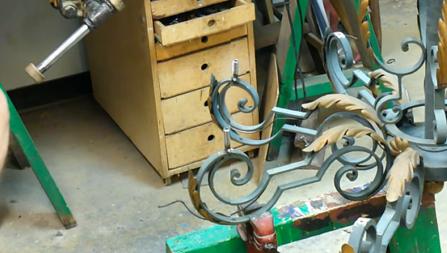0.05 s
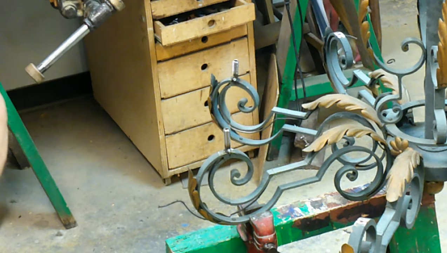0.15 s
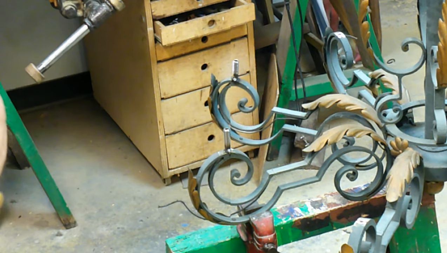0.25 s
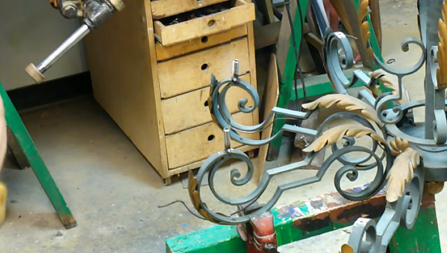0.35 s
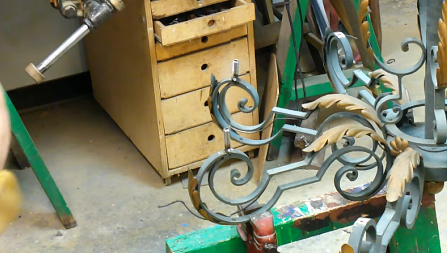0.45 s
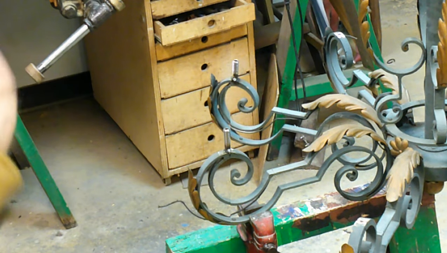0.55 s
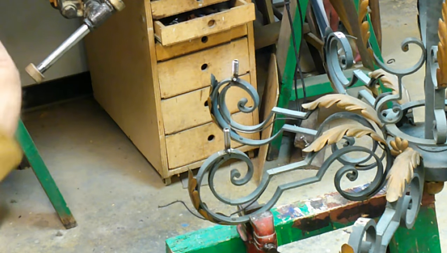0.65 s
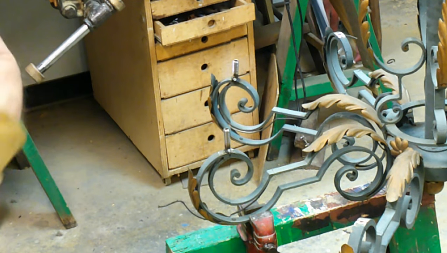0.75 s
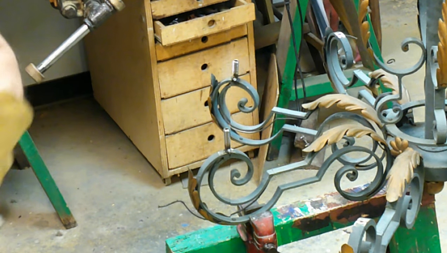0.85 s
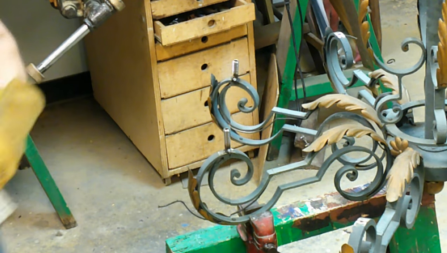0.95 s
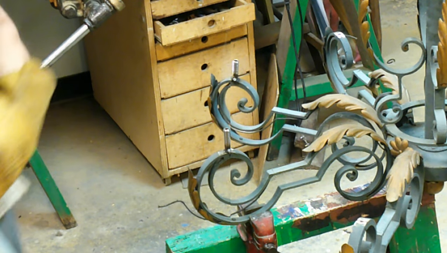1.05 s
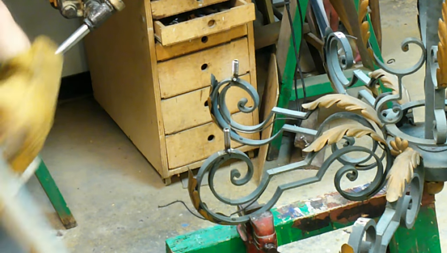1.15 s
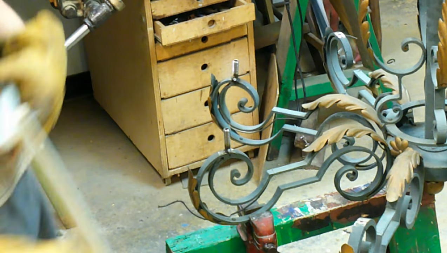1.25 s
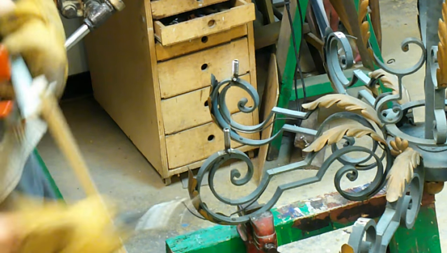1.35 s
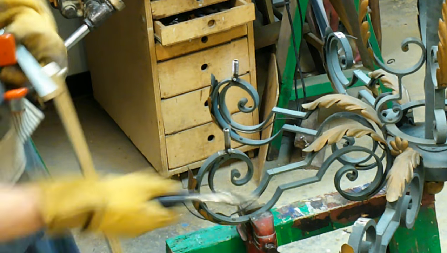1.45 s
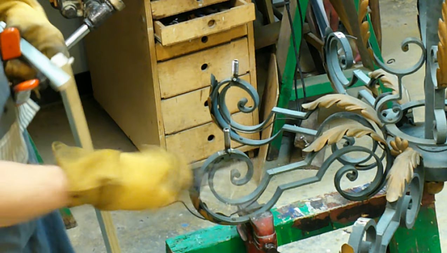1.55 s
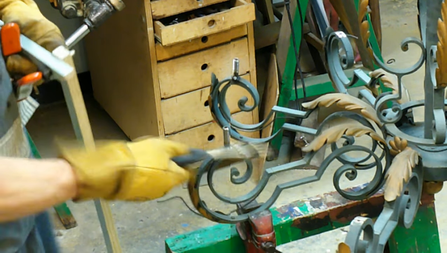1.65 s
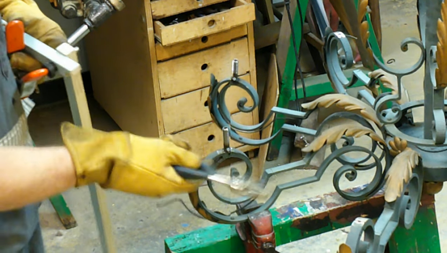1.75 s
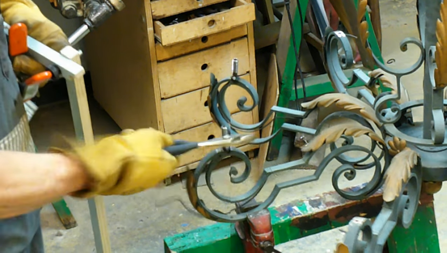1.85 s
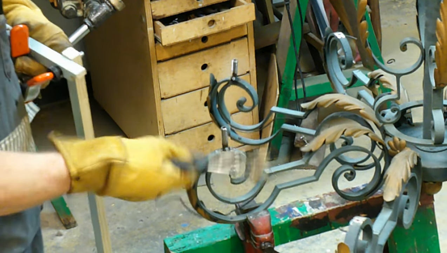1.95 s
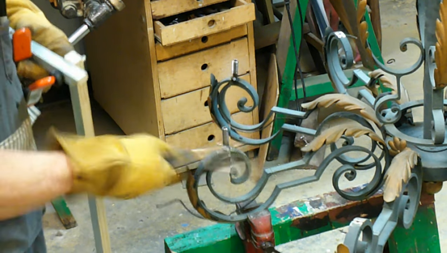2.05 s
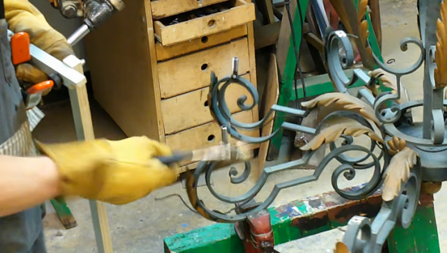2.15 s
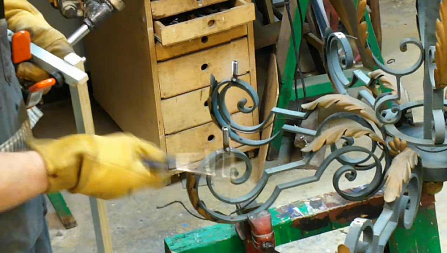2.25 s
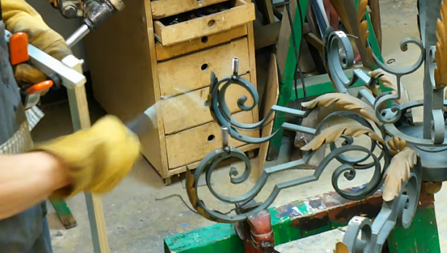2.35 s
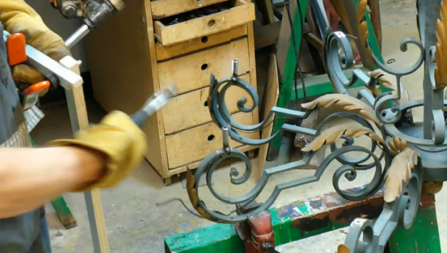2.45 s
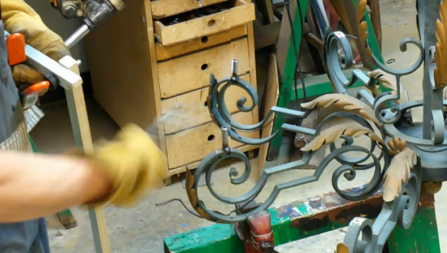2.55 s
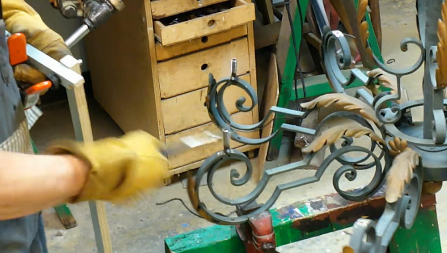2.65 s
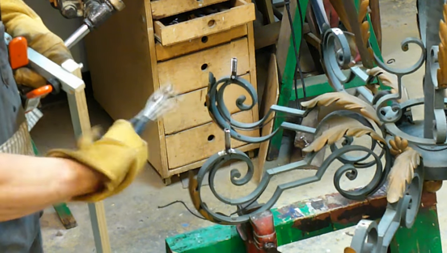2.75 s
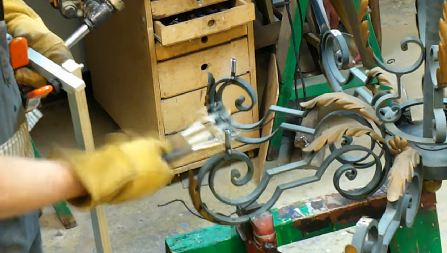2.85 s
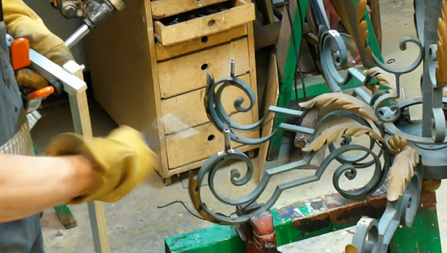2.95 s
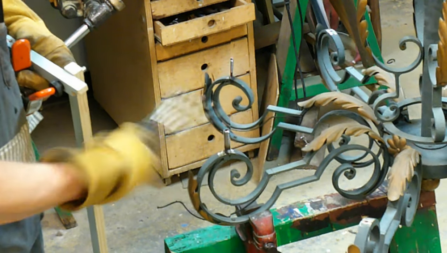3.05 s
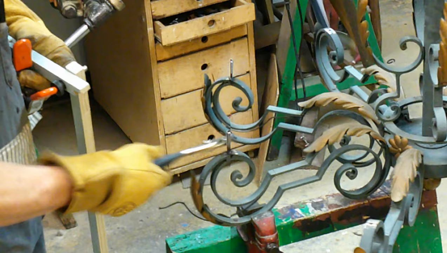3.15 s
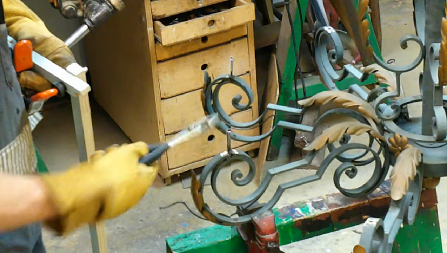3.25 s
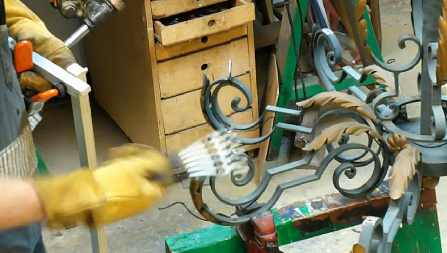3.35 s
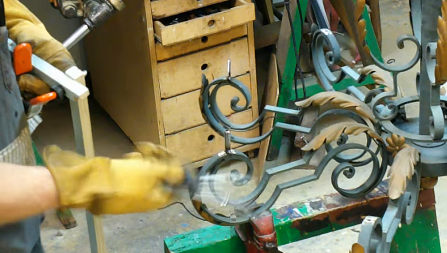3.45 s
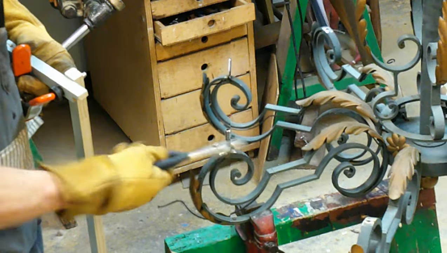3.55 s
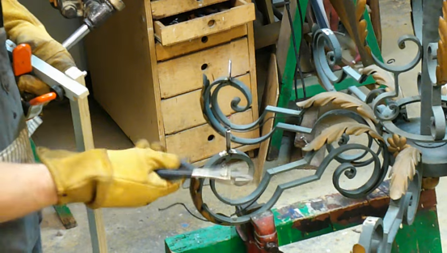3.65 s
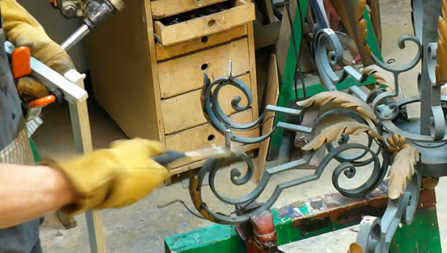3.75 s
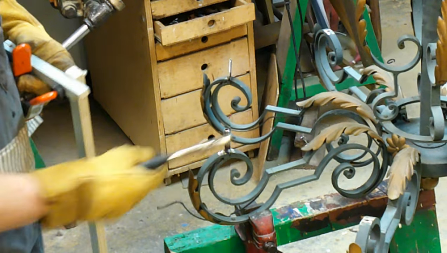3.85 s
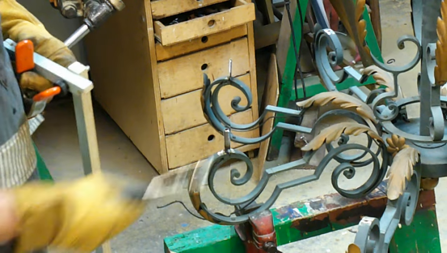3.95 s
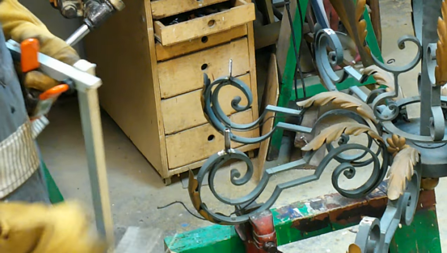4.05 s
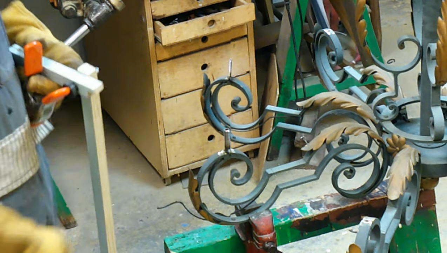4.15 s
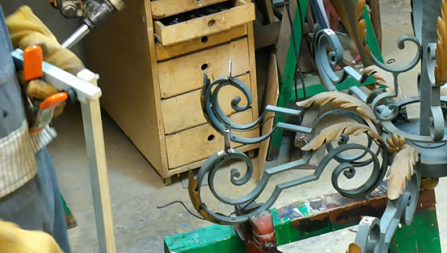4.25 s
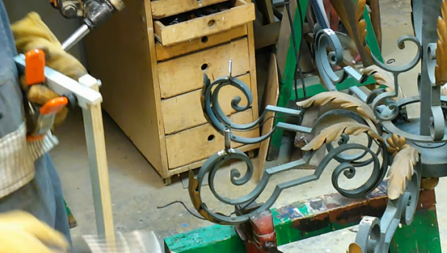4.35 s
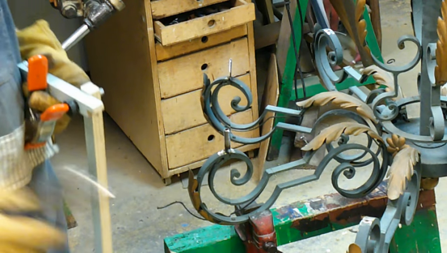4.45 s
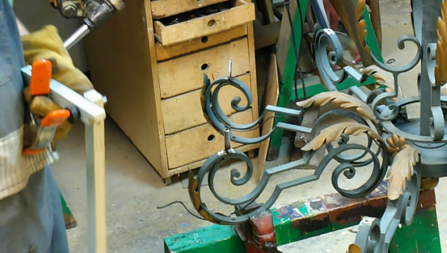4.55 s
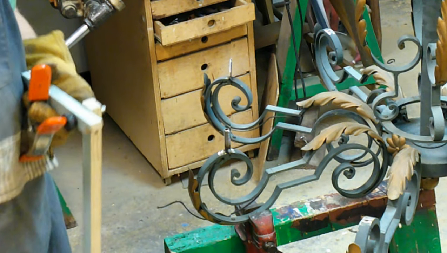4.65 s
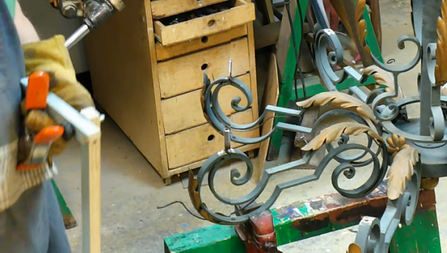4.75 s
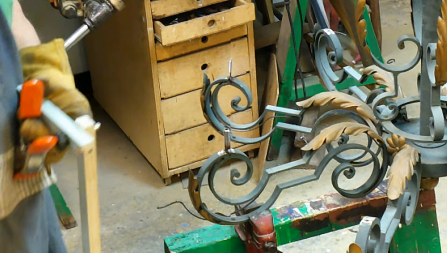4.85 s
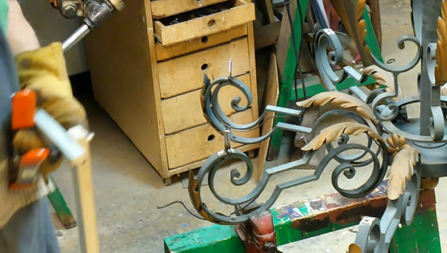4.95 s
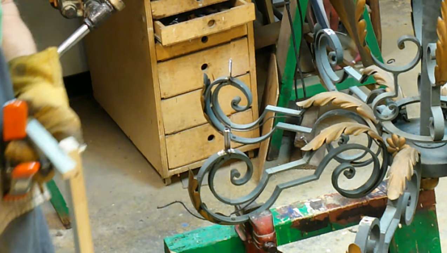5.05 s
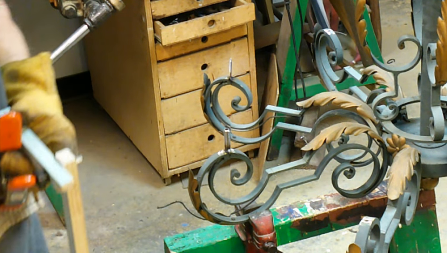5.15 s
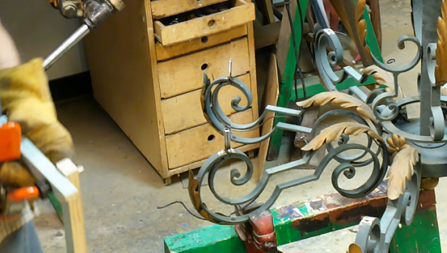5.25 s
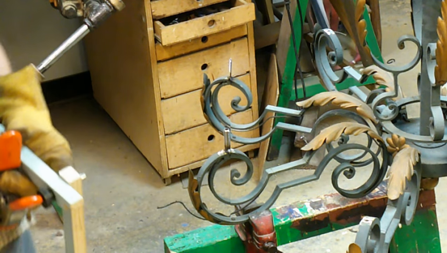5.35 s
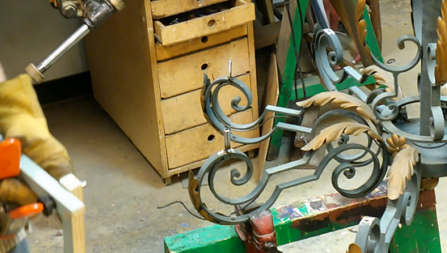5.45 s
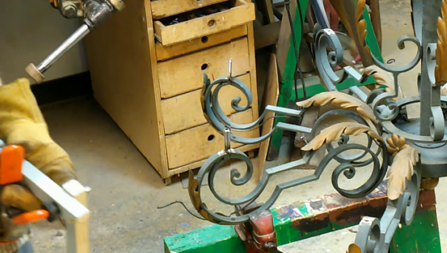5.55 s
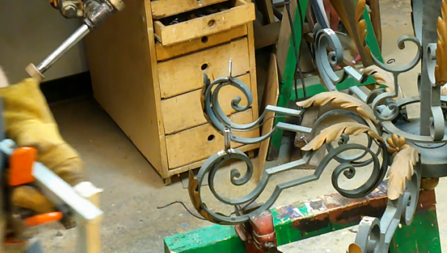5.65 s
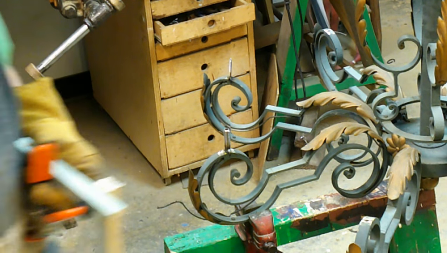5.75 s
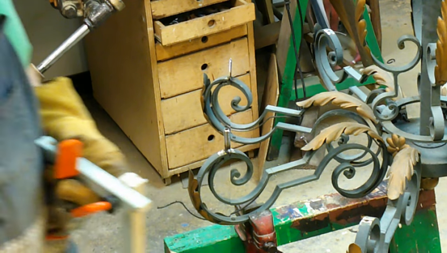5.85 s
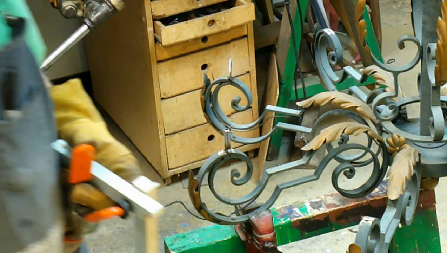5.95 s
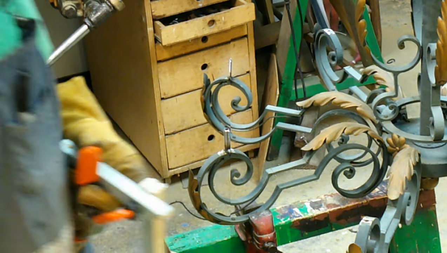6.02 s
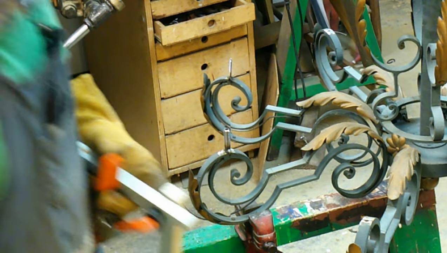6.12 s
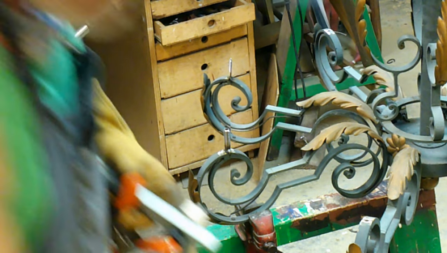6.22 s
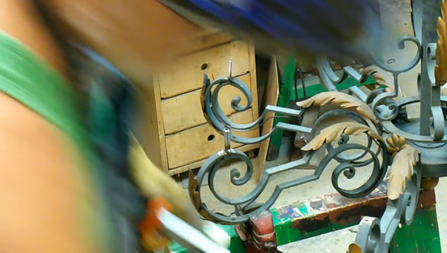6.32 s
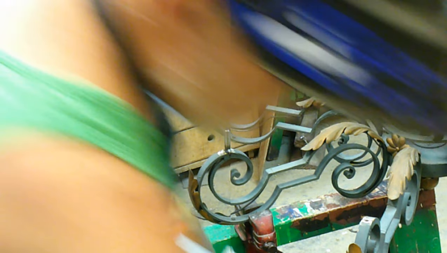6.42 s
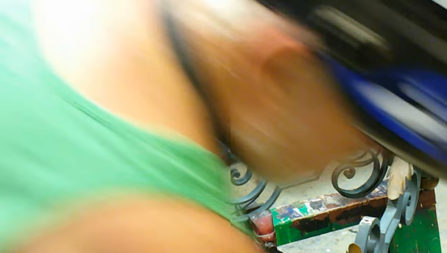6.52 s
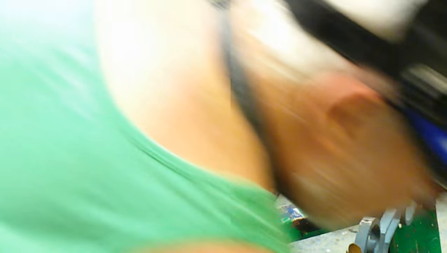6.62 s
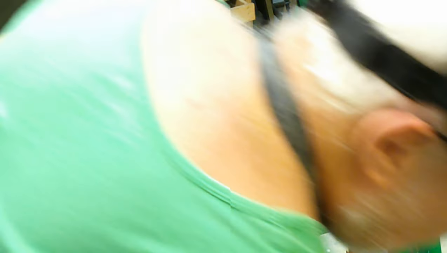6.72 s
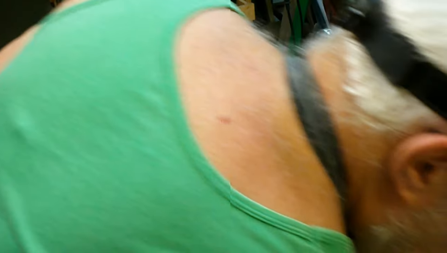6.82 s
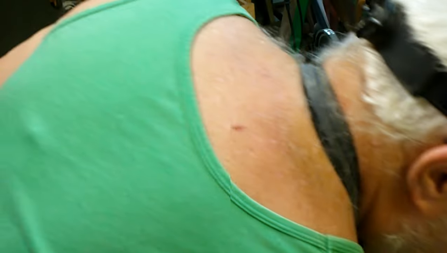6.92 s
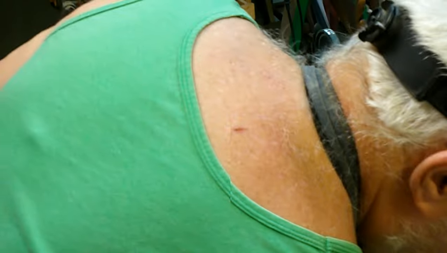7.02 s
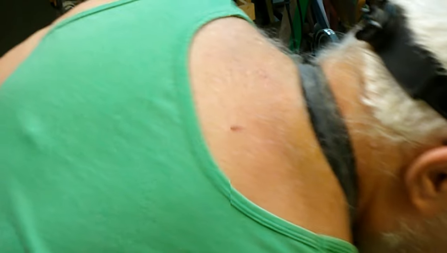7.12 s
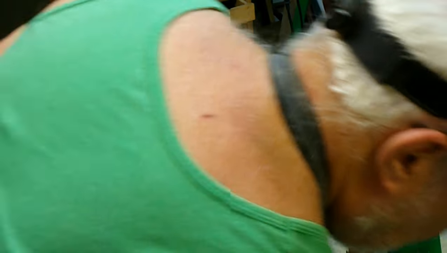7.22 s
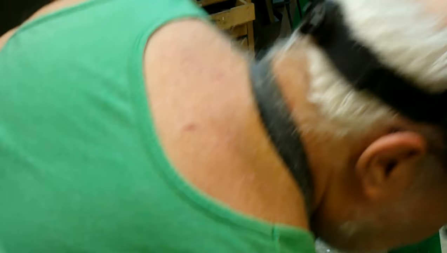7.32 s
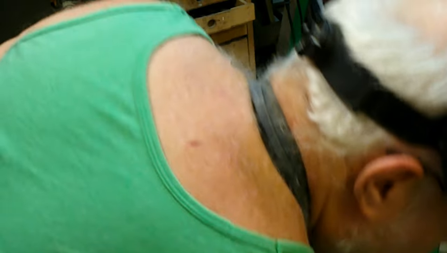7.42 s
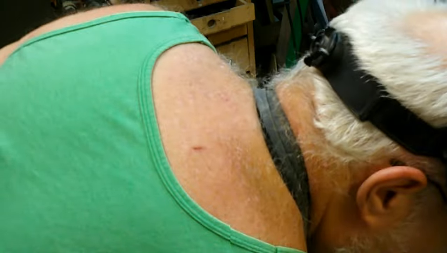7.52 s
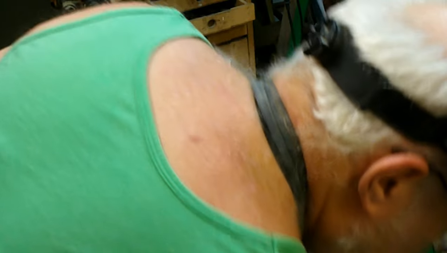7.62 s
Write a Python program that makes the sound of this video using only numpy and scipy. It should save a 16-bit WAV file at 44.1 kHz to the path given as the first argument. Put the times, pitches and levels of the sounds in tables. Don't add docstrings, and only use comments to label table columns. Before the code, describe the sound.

In a humming workshop, a clamp clanks and wood knocks, then nine hard metallic taps crack and ring briefly, followed by light handling sounds.

```python
import sys
import numpy as np
from scipy import signal
from scipy.fft import rfft, irfft, next_fast_len
from scipy.io import wavfile
from scipy.ndimage import uniform_filter1d, map_coordinates

SR = 44100
rng = np.random.default_rng(int(sys.argv[2]) if len(sys.argv) > 2 else 0)


def voltage_ratio(level):
    return 10 ** (np.asarray(level, float) / 20)


def wav_out(sig):
    wavfile.write(sys.argv[1], SR, np.round(np.clip(np.atleast_2d(sig).T, -1, 1) * 32767).astype(np.int16))


N = 338688


def unit(x):
    return x / np.sqrt(np.mean(x ** 2) + 1e-20)


def along(points, hz):
    point_hz, value = np.transpose(points)
    return np.interp(np.log(hz + 1), np.log(point_hz + 1), value)


def filtered(x, response):
    size = next_fast_len(N + 8192)
    return irfft(rfft(x, size) * response(np.fft.rfftfreq(size, 1 / SR)), size)[..., :N]


def wobble(rate):
    knots = rng.standard_normal(int(N * rate / SR) + 4)
    return map_coordinates(knots, [np.arange(N) * rate / SR])


def patches(shape, across_hz, across_time):
    field = uniform_filter1d(rng.standard_normal(shape), size=across_hz, axis=0)
    return unit(uniform_filter1d(field, size=across_time, axis=1))


# time_s, rush_db
MACHINE_LEVEL = [
    (0, -35),
    (5, -35),
    (5.78, -34.5),
    (6.27, -34.5),
    (7.34, -34.5),
    (7.53, -39),
    (7.68, -42.5),
]
# pitch_hz, level_db (per Hz)
AIR_RUSH = [(12, -49), (20, -27), (178, -18.5), (206, -3.5), (380, -13.5), (409, -5.5), (562, -8),
            (605, -5), (875, -2.5), (989, -3.5), (1300, -4.5), (2450, -11), (3290, -11.5), (4990, -25),
            (7040, -22.5), (9150, -59), (15500, -120)]
# pitch_hz, level_db
FAN_TONES = [(211.4, -50), (233, -58.5), (416, -60), (690, -65.5), (874, -48), (639, -49), (1060, -62.5),
             (1325, -50.5), (1430, -57), (1700, -54), (2012, -55.5), (2724, -54.5), (3235, -63.5)]


def machine():
    t = np.arange(N) / SR
    level_db = np.interp(t, *np.transpose(MACHINE_LEVEL))
    z = signal.stft(rng.standard_normal(N), nperseg=512)[2]
    air = signal.istft(z * voltage_ratio(1.13 * patches(z.shape, 5, 10)), nperseg=512)[1][:N]
    air = unit(filtered(air, lambda f: voltage_ratio(along(AIR_RUSH, f)))) * voltage_ratio(-1.0 + 0.6 * wobble(12))
    tones = np.zeros(N)
    for hz, db in FAN_TONES:
        drift = 2 * np.pi * 3 * np.cumsum(wobble(12)) / SR
        tones += voltage_ratio(db + 37.0 + 2.8 * wobble(6)) * np.sin(2 * np.pi * hz * t + drift)
    return voltage_ratio(level_db) * (air + tones)


def rafters():
    level_db, t60_s, rise_s = -28.5, 1.14, 0.031
    swell, t = np.zeros(N + SR), np.arange(SR) / SR
    shape = voltage_ratio(-60 * t / t60_s) * (1 - np.exp(-t / rise_s))
    for start_s, db, *_ in TAPS:
        swell[round(start_s * SR):][:SR] += voltage_ratio(db) * shape
    tilt = [(1500, 0.5), (6000, 8)]  # (Hz, dB)
    wash = filtered(rng.standard_normal(N), lambda f: voltage_ratio(along(AIR_RUSH, f) + along(tilt, f)))
    return voltage_ratio(level_db) * swell[:N] * unit(wash)


def crowding_db(crowds, hz):
    humps = sum(voltage_ratio(db - 3.5) * np.exp(-((hz - centre) / (width + 150)) ** 2)
                for centre, width, db in crowds)
    return 20 * np.log10(1 + humps)


def dying(level_db, t60, size=128, clumps_db=0):
    hz, t, z = signal.stft(rng.standard_normal(SR // 2), SR, nperseg=size)
    clumps = clumps_db * patches(z.shape, 2, 6)
    decay_db = -60 * t / t60(hz)[:, None]
    shaped = z * voltage_ratio(clumps + level_db(hz)[:, None] + decay_db)
    return signal.istft(shaped, SR, nperseg=size)[1][:SR // 2]


# pitch_hz, level_db (per Hz)
DENSE_IRON = [(60, -48), (180, -18.5), (300, -17), (600, -8.5), (900, -4), (1400, -1), (1600, -6),
              (3300, -3), (4300, -3.5), (5200, -4.5), (6400, 0.5), (7200, -1), (9000, -35), (15000, -120)]
# pitch_hz, t60_s
DENSE_DECAY = [(150, .3), (500, 0.36), (1200, 0.32), (2500, 0.2), (4500, 0.14), (7000, 0.17)]
# pitch_hz, level_db
CONTACT_CRACK = [(150, -41), (500, 0), (2000, 3.5), (7000, -1)]
# pitch_hz, t60_s
SHOP_DECAY = [(200, 0.86), (1000, 0.52), (3000, 0.39), (7000, 0.37)]
TONE_BANDS = [500, 1350, 3000, 5800]


def knocks(events, modes, ring_db, dense_db, crack_db, lows_db, scatter_db, rise, wet_db, crowds=()):
    out, t = np.zeros(N + 2 * SR), np.arange(SR // 2) / SR
    hz, level_db, t60 = np.transpose(modes)[:, :, None]
    t60 = np.minimum(t60, 0.55)
    for start_s, db, body_db, sheen_db, damp in events:
        balance = list(zip(TONE_BANDS, [body_db + lows_db, body_db, 0, sheen_db]))

        def dense_level(f):
            return dense_db + along(DENSE_IRON, f) + along(balance, f) + crowding_db(crowds, f)

        def crack_level(f):
            return crack_db + along(CONTACT_CRACK, f) + along(balance, f)

        strength, phase, beat_rate = rng.standard_normal((3, len(modes), 1))
        beat = 1 + 0.36 * np.sin(2 * np.pi * 25 * (1 + beat_rate) * t + 3 * phase)
        envelope = voltage_ratio(ring_db + level_db + scatter_db * strength) * np.exp(-np.log(1000) / t60 * t)
        ring = (beat * envelope * np.sin(2 * np.pi * hz * t + phase)).sum(axis=0)
        dense = dying(dense_level, lambda f: damp * along(DENSE_DECAY, f), size=256, clumps_db=1.58)
        crack = dying(crack_level, lambda f: 0.0068 + 0 * f)
        blow = (ring + dense) * (1 - np.exp(-t / rise)) + crack
        tail = dying(np.zeros_like, lambda f: along(SHOP_DECAY, f)) * (1 - np.exp(-t / 0.0034))
        echo = voltage_ratio(wet_db) * signal.fftconvolve(dense + crack, tail / np.linalg.norm(tail))
        start = round(start_s * SR)
        out[start:][:len(t)] += voltage_ratio(db) * blow
        out[start:][:len(echo)] += voltage_ratio(db) * echo
    return out[:N]


# start_s, level_db (peak), pitch_hz, t60_s
SNAPS = [
    (.7182, -4, 930, .035),
    (5.192, -11.5, 1000, .005),
    (5.2135, -12, 1500, .006),
    (5.2225, -19, 600, .015),
    (1.3915, -21, 1100, .025),
    (7.428, -16, 1250, .03),
    (7.43, -20, 3200, .04),
    (5.478, -27, 900, .04),
    (4.28, -36, 1320, .3),
]


def snaps():
    out, t = np.zeros(N), np.arange(SR // 5) / SR
    for start_s, db, hz, t60 in SNAPS:
        out[round(start_s * SR):][:len(t)] += voltage_ratio(db - 60 * t / t60) * np.sin(2 * np.pi * hz * t)
    return out


# start_s, level_db (peak), body_db, sheen_db, decay (factor)
CLAMP_BLOWS = [
    (0.4663, 1.04, -6.5, -16, 0.99),
]
STICK_BLOWS = [
    (0.5494, -25.5, 5, -8, 0.67),
    (0.7173, -14.5, 8, -25, 0.32),
    (0.7444, -24, 2, -20, 0.42),
    (0.7744, -28.5, 2, -15, 0.7),
    (0.799, -34, -8, -9, 0.66),
]
PART_BLOWS = [
    (0.0114, -12.5, -8, -19.5, 0.52),
    (0.0844, -21, -13, -20, 0.41),
    (1.3904, -22, 6, -15, 0.7),
    (5.2124, -10, -4.5, -19.5, 0.44),
    (5.4774, -41, -7, -19, 0.5),
    (6.2135, -28.5, -7, -9.5, 1),
    (7.4163, -17, -0.5, -6, 0.92),
]
PIN_BLOWS = [
    (5.2313, -24.5, -20, -4, 1),
]
# start_s, level_db (peak), sheen_db
SCUFFS = [
    (0.6202, -29, -6),
    (0.8628, -27, -10),
    (4.658, -22, -28),
    (4.679, -28, -23),
    (5.4047, -33, -9),
    (6.4557, -28, -28),
    (7.194, -26, -16),
]
# pitch_hz, level_db, t60_s
CLAMP_MODES = [(1330, -14, .25), (1642, -14, .25), (1879, -2, .17), (2498, -7.5, .4), (2525, -7, .18),
               (2632, -7, .16), (2794, -6, .17), (3219, -2, .25), (3330, -7, .15), (4054, -6, .15),
               (4200, -3, .08), (4339, -8, .14), (4646, -14, .14), (5900, -12, .08)]
STICK_MODES = [(480, -9, .24), (530, -8, .15), (700, -8, .1), (861, -3, .17), (942, 0, .19),
               (1040, -5, .14), (1297, -10, .1), (2003, -8, .05), (3200, -10, .04)]
PART_MODES = [(640, -18, .05), (1040, -21, .06), (3275, 1, 0.087)]
PIN_MODES = [(3400, -8, .05), (6450, -4, .04), (6600, -9, .16), (6800, -4, .05)]


def handling():
    clamp = knocks(CLAMP_BLOWS, CLAMP_MODES, ring_db=-8, dense_db=4.5, crack_db=3, lows_db=-13,
                   scatter_db=0, rise=0.0008, wet_db=-10)
    stick = knocks(STICK_BLOWS, STICK_MODES, ring_db=0, dense_db=5.5, crack_db=-12, lows_db=0.5,
                   scatter_db=2.0, rise=0.0007, wet_db=-5.0, crowds=[(760, 110, 1.8)])
    parts = knocks(PART_BLOWS, PART_MODES, ring_db=-28.5, dense_db=5.5, crack_db=5, lows_db=2,
                   scatter_db=-5, rise=0.0028, wet_db=-6.5)
    soft = [(start_s, db, -1.5, sheen_db, 0.52) for start_s, db, sheen_db in SCUFFS]
    scuffs = knocks(soft, PART_MODES, ring_db=-30, dense_db=12, crack_db=-30, lows_db=-5,
                    scatter_db=0, rise=0.015, wet_db=-12)
    pin = knocks(PIN_BLOWS, PIN_MODES, ring_db=6, dense_db=4, crack_db=-3, lows_db=9,
                 scatter_db=0, rise=0.001, wet_db=-9)
    return clamp + stick + parts + scuffs + pin + snaps()


# start_s (mid-swell), length_s, low_tone_db, high_tone_db
BLADE_SWINGS = [
    (2.04, .2, -50, -43),
    (2.33, .12, -54, -46),
    (2.54, .24, -48, -46),
    (3.345, .26, -45, -54),
    (3.97, .2, -43, -52),
]
BLADE_TONES = [5520, 6860]


def blade():
    t = np.arange(N) / SR
    flutter = voltage_ratio(4 * np.array([wobble(60), wobble(60)]))
    low, high = flutter * np.sin(2 * np.pi * np.outer(BLADE_TONES, t))
    out = np.zeros(N)
    for middle_s, length_s, low_db, high_db in BLADE_SWINGS:
        swell = np.cos(np.pi * np.clip((t - middle_s) / length_s, -0.5, 0.5)) ** 2
        out += swell * (voltage_ratio(low_db) * low + voltage_ratio(high_db) * high)
    return out


# start_s, level_db (peak), first_scroll_db, second_scroll_db, third_scroll_db
TAPS = [
    (1.6518, 1, 5, 6.5, 4.5),
    (1.8878, -1, 1.5, 5.5, 0.5),
    (2.1209, -0.5, -3.5, -5.5, -16),
    (2.3605, -2.5, -6, -19, -1),
    (2.6504, -0.5, 3.5, 2, 1.5),
    (2.9032, -0.5, 2.5, 3, -15),
    (3.1447, 0, 3, -3.5, -9),
    (3.565, 0, 3, -1, -4),
    (3.8003, -.5, -18, -5, -1),
]
# pitch_hz, pitch_hz, pitch_hz
UNDER_TOOL = [(1443, 4915, 5340), (1750, 3386, 956), (956, 4915, 2772), (705, 4258, 4360),
              (1443, 3386, 2261), (4915, 3957, 2406), (2024, 1168, 4549), (3739, 2355, 5391),
              (3163, 6740, 3620)]
# pitch_hz, level_db, t60_s
SCROLL_1 = [(705, -8.9, 0.36), (956, -5.6, 0.29), (1168, -8.3, 0.4), (1698, -6.3, 0.35), (1750, -8.9, 0.49),
            (2024, -12.0, 0.53), (2406, -10.8, 0.52), (2772, -11.8, 0.55), (3066, -12.4, 0.31),
            (3386, -11.5, 0.3), (3814, -15.1, 0.28), (4258, -14.6, 0.4), (4360, -17.1, 0.28),
            (4549, -18.6, 0.27)]
SCROLL_2 = [(1061, -8.2, 0.43), (1354, -4.6, 0.57), (1443, -3.6, 0.27), (2261, -10.9, 0.45),
            (3957, -14.4, 0.31), (4858, -19.6, 0.28), (4915, -18.1, 0.33), (5101, -21.5, 0.27),
            (5340, -22.7, 0.28), (5391, -21.7, 0.31), (5486, -20.3, 0.5), (5604, -20.5, 0.29),
            (5924, -17.8, 0.44), (6027, -16.0, 0.27)]
SCROLL_3 = [(466, -15.2, 0.33), (565, -14.9, 0.6), (1836, -6.4, 0.3), (2355, -10.3, 0.43),
            (2964, -11.5, 0.36), (3163, -9.4, 0.28), (3270, -10.9, 0.35), (3620, -10.8, 0.28),
            (3739, -14.8, 0.32), (5706, -19.5, 0.33), (6527, -15.5, 0.3), (6740, -18.5, 0.28),
            (6858, -18.5, 0.52)]
# pitch_hz, width_hz, level_db
SCROLL_CROWDS = [
    [(1000, 39, -26.5), (1814, 17, 1), (4230, 50, -9.5)],
    [(1380, 140, -4), (3420, 16, 0.5), (4950, 40, -28.5)],
    [(694, 30, -35.5), (3090, 32, -14), (6260, 45, 8)],
]


def taps():
    lows_db, mids_db, highs_db = -6, -8, -9.5
    brighter_db_per_db, shorter_per_db = 3.3, 0.3148
    favour_db, favour_crowd_db, favour_width_hz = 9, -8, 20
    ring_share = 0.75
    out = np.zeros(N)
    for (start_s, db, *reach), favoured in zip(TAPS, UNDER_TOOL):
        modes, crowds = [], []
        for reach_db, scroll, humps in zip(reach, [SCROLL_1, SCROLL_2, SCROLL_3], SCROLL_CROWDS):
            for hz, level_db, t60 in scroll:
                modes.append((hz, level_db + reach_db + favour_db * (hz in favoured), ring_share * t60))
            for hz, width_hz, level_db in humps:
                crowds.append((hz, width_hz, level_db + reach_db))
        crowds += [(hz, favour_width_hz, favour_crowd_db) for hz in favoured]
        tap = (start_s, db, mids_db, highs_db + brighter_db_per_db * db, 1 - shorter_per_db * db)
        out += knocks([tap], modes, ring_db=-17.5, dense_db=7.5, crack_db=4, lows_db=lows_db - mids_db,
                      scatter_db=2.5, rise=0.0021, wet_db=-11.5, crowds=crowds)
    return out


def scene():
    no_bass = signal.butter(3, 215, "high", fs=SR, output="sos")
    struck = signal.sosfilt(no_bass, taps() + rafters() + handling())
    return (struck + blade() + machine())[None]


# pitch_hz, level_db (per Hz)
NOISE_FLOOR = [(12, -47), (20, -8.5), (283, 2.5), (362, -20), (719, 5.5), (774, -4), (7040, -28.5),
               (9150, -58), (15500, -120)]


def self_noise():
    return voltage_ratio(-52) * unit(filtered(rng.standard_normal(N), lambda f: voltage_ratio(along(NOISE_FLOOR, f))))


# start_s, end_s, above_hz
TREBLE_GAPS = [
    (.449, .459, 3700),
    (1.601, 1.644, 3900),
    (1.866, 1.876, 5200),
    (2.627, 2.642, 3800),
    (2.886, 2.892, 3900),
    (3.523, 3.557, 3100),
    (3.78, 3.788, 3200),
]


def treble_dropouts(band):
    t = np.arange(N) / SR
    for start_s, end_s, above_hz in TREBLE_GAPS:
        gap = np.clip(np.minimum(t - start_s, end_s - t) / 0.002 + 0.5, 0, 1)
        dull = signal.sosfilt(signal.ellip(8, 1, 70, above_hz, fs=SR, output="sos"), band)
        band = band + gap * (dull - band)
    return band


def roll_off(x):
    return signal.sosfilt(signal.butter(12, 15800, fs=SR, output="sos"), x)


def record(dry):
    t = np.arange(N) / SR
    camera_rate_hz = 16000
    loud = dry / (1 + np.abs(dry / 1.073) ** 6) ** (1 / 6)
    loud = signal.sosfilt(signal.butter(1, 40, "high", fs=SR, output="sos"), loud) + self_noise()
    band = treble_dropouts(filtered(loud, lambda f: 1 / (1 + (f / 7270) ** 90)))
    mirror = band * np.cos(2 * np.pi * camera_rate_hz * t)
    band = band + voltage_ratio(-21.5) * filtered(mirror, lambda f: np.exp(-((f - 8800) / 220) ** 2))
    return roll_off(np.clip(band, -0.985, 0.985))


dry = scene()
out = record(dry)
wav_out(out)
```